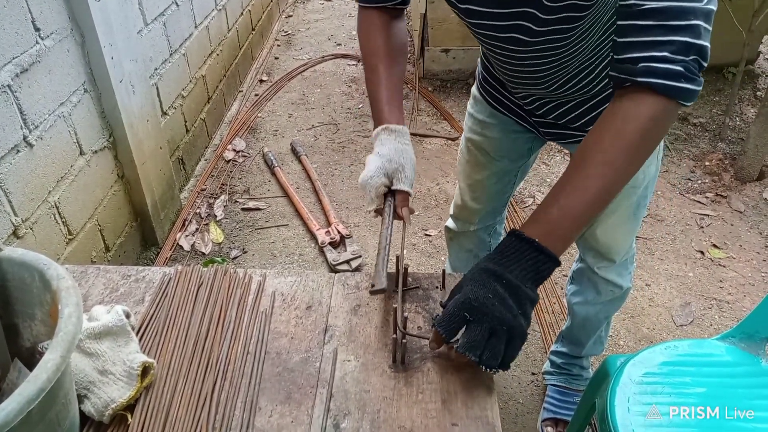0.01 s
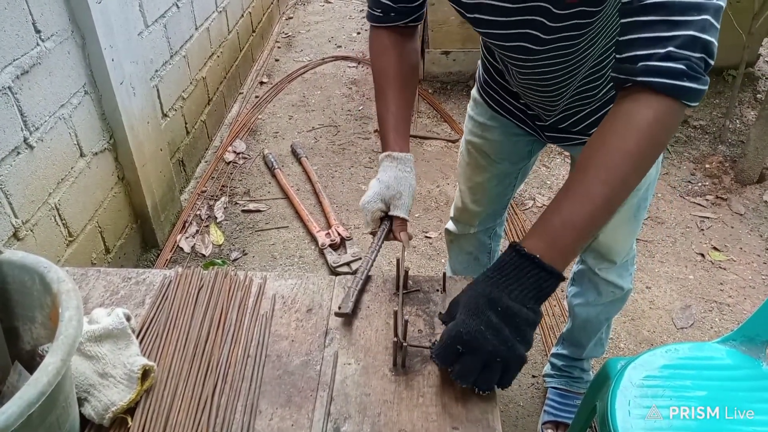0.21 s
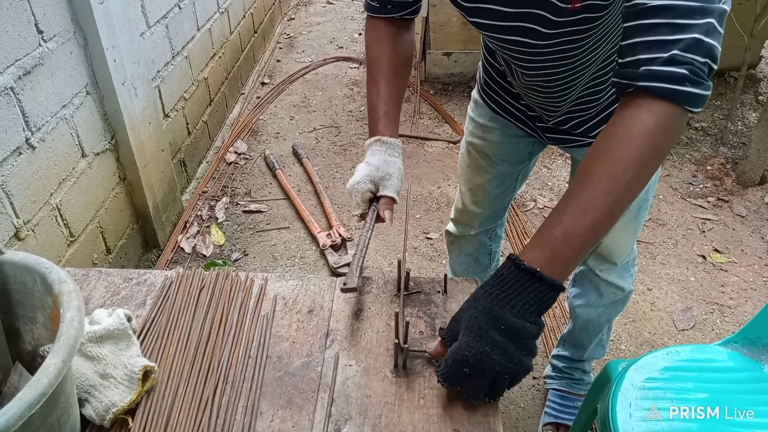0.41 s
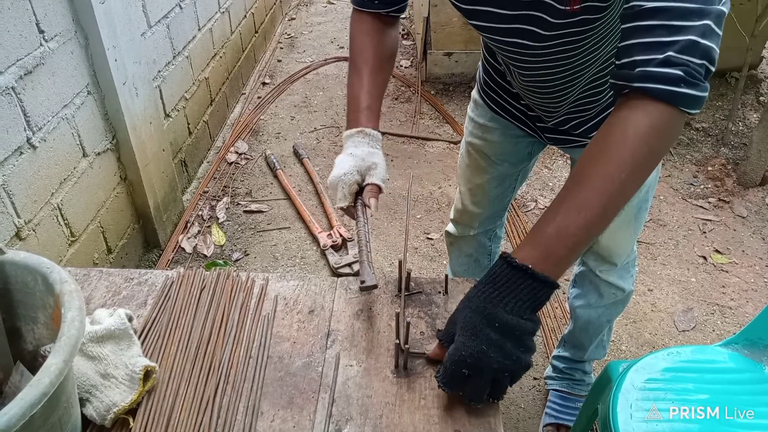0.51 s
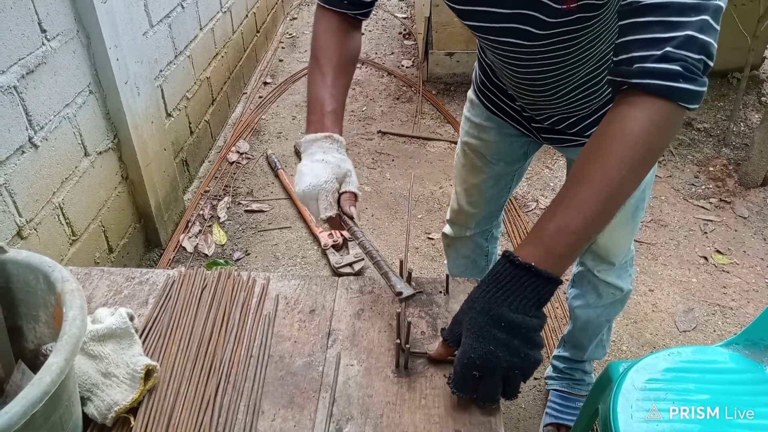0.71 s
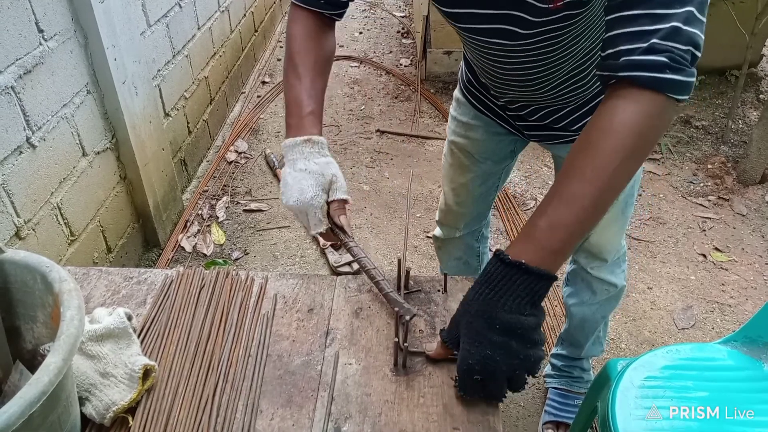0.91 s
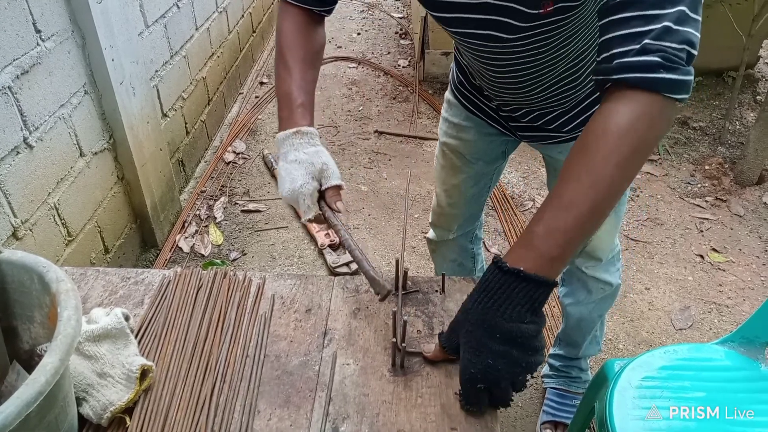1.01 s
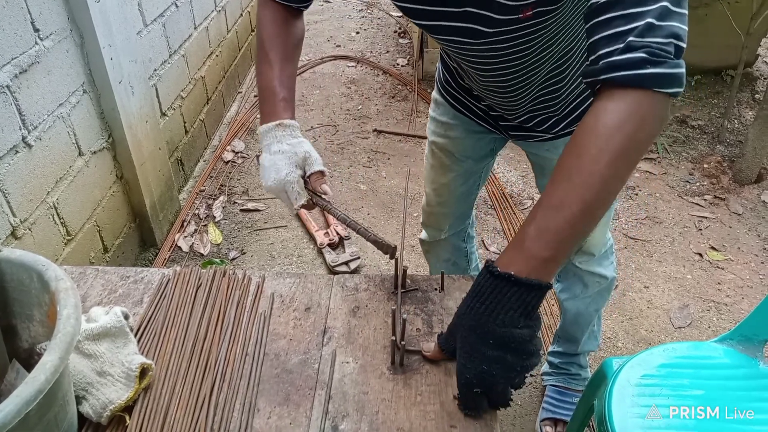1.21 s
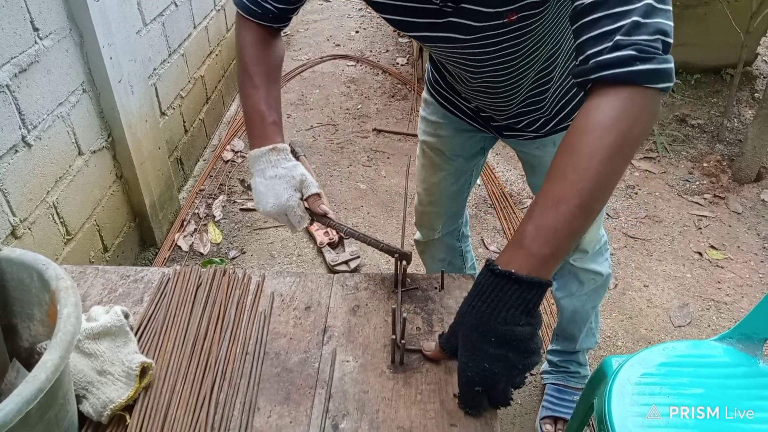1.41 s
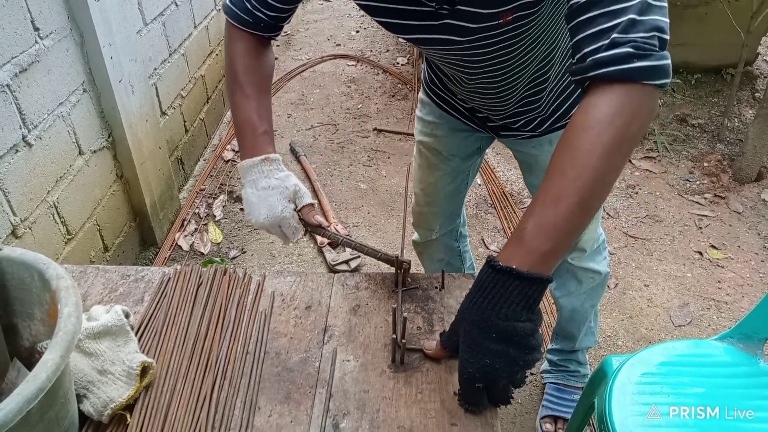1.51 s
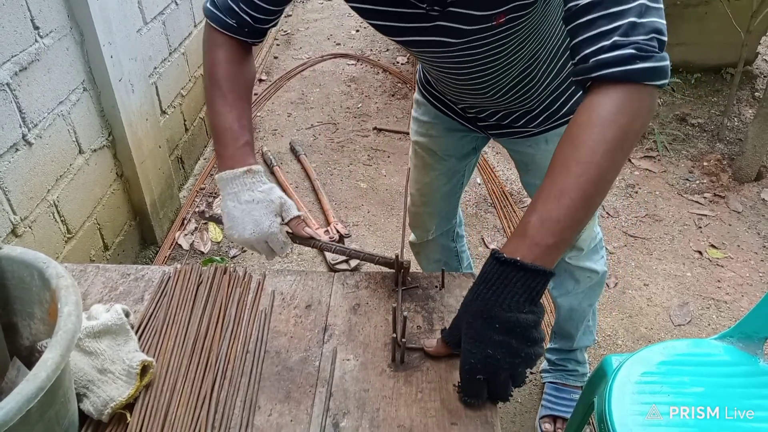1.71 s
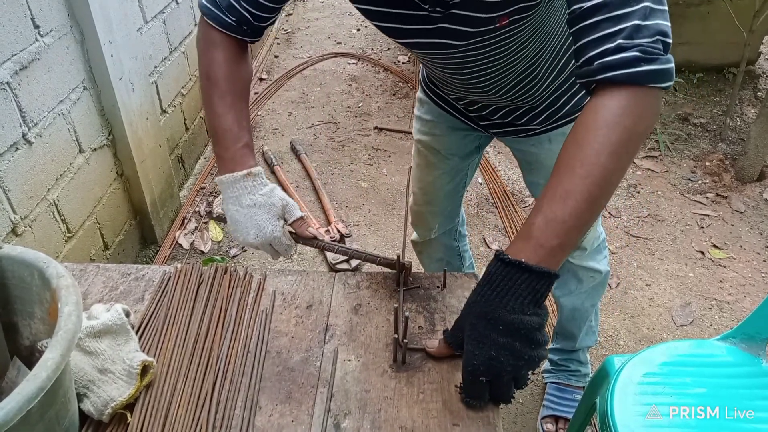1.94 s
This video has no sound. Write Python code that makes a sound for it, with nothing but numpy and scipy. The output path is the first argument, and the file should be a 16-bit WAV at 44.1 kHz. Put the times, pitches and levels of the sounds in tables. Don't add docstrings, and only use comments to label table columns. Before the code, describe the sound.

A steel bar scrapes grittily over a wooden bench and thuds down, then clinks sharply on a steel pin, clinks again, bounces and ends in a quick metallic rattle; quiet yard with insects, close phone microphone.

```python
import sys
import numpy as np
from scipy import signal
from scipy.fft import rfft, irfft, next_fast_len
from scipy.io import wavfile
from scipy.ndimage import uniform_filter1d, minimum_filter1d, map_coordinates

SR = 44100
rng = np.random.default_rng(int(sys.argv[2]) if len(sys.argv) > 2 else 0)


def volts(x):
    e = np.asarray(x, float) / 20
    return 10 ** e


def materialize(psi):
    bounded = np.clip(np.atleast_2d(psi).T, -1, 1)
    quanta = np.round(bounded * 32767).astype(np.int16)
    wavfile.write(sys.argv[1], SR, quanta)


N = 85995

# f/Hz, level/dB, t60/s
BAR_MODES = [(350, -24, .1), (807, -19, .18), (1362, -24, .12), (1680, -18, .12), (1949, -14, .07),
             (2187, -3, .07), (2353, -13, .09), (2864, -2, .06), (3050, -8, .06), (3280, -4, .075),
             (3569, -9, .07), (4030, -1, .055), (6444, -30, .035), (7720, -36, .036)]
# f/Hz, level/dB
STEEL_CLATTER = [(100, -12), (450, -3.5), (620, -16.5), (975, -5), (1220, -14.5), (3500, 4), (4400, -8.5),
                 (5700, -30.5), (15500, -51)]
# f/Hz, level/dB
GRIT_SPECTRUM = [(120, -31.5), (250, -6), (950, 0.5), (1500, -7.5), (3500, 1), (4500, -16.5), (5500, -22.5),
                 (15000, -68)]
STEEL_RISE_S, WOOD_RISE_S = .0008, .0024
STEEL_CRACK, WOOD_CRACK = 3.3, 1.5


def knocks():
    return bench_blows() + pin_and_key_blows() + bar_blows() + rattle() + small_touches()


def bench_blows():
    # f/Hz, level/dB, t60/s
    top_modes = [(210, -4, .06), (320, -3, .07), (410, 0, .085), (474, -1, .085), (764, -15, .12),
                 (877, -17, .12), (2982, -16, .08)]
    # f/Hz, level/dB, t60/s
    edge_modes = [(337, 0, .11), (931, -6, .07), (1307, -15, .06), (1567, -21, .085), (2250, -24, .1),
                  (3095, -24, .14)]
    # f/Hz, level/dB
    wood_clatter = [(80, -12.5), (200, 1.5), (420, -5), (614, -12.5), (800, -12.5), (3460, -16),
                    (4900, -43.5), (15500, -79.5)]
    # t/s, ring level/dB, clatter level/dB, clatter t60/s
    thuds = [
        (.2095, -7.5, -13, 0.089),
        (.2255, -36, -12, 0.076),
    ]
    # t/s, ring level/dB, clatter level/dB, clatter t60/s
    taps = [
        (.5615, -14, -25.5, 0.12),
        (.665, -42, -44, 0.29),
    ]
    on_top = strike(thuds, top_modes, wood_clatter, WOOD_RISE_S, WOOD_CRACK)
    on_edge = strike(taps, edge_modes, wood_clatter, WOOD_RISE_S / 2, WOOD_CRACK)
    return on_top + on_edge


def pin_and_key_blows():
    # f/Hz, level/dB, t60/s
    pin_modes = [(332, -11, .14), (474, -13, .12), (930, -13, .1), (1340, -9, .07), (1760, -9, .096),
                 (1965, -13, .1), (2250, -15, .09), (2984, 1, .13), (3068, -13, .14), (3150, -9, .11),
                 (3418, -10, .17), (3531, -6, .12), (3706, -11, .12), (8969, -46, .17)]
    # f/Hz, level/dB, t60/s
    key_modes = [(700, -6, .065), (750, -19, .2), (797, -23, .2), (1744, -6, .05), (2256, -9, .065),
                 (2625, 0, .062), (3488, -4, .055), (3790, -3, .03), (4120, -4, .04), (4737, -24, .11),
                 (6702, -28, .085), (8974, -35, .085), (11500, -37, .075), (14360, -43, .09)]
    # f/Hz, level/dB
    pin_top = [(8000, -42.5), (12500, -43.5), (15500, -57)]
    # f/Hz, level/dB
    key_top = [(8000, -30), (12500, -40.5), (15500, -54)]
    # t/s, ring level/dB, clatter level/dB, clatter t60/s
    pin_hits = [
        (.8383, -55, -27, 0.021),
        (.8397, -10, -7.5, 0.045),
        (.8475, -28, -7.5, 0.032),
        (.8503, -15.5, -16, 0.13),
    ]
    # t/s, ring level/dB, clatter level/dB, clatter t60/s
    key_hits = [
        (1.2637, -9, -14, 0.05),
        (1.268, -46.5, -15, 0.065),
    ]
    return steel_blows(pin_hits, pin_modes, pin_top) + steel_blows(key_hits, key_modes, key_top)


def bar_blows():
    # f/Hz, level/dB, t60/s
    rebound_modes = [(810, -17, .09), (1965, -11, .09), (2191, -10, .09), (2900, -5, .05), (3214, -1, .05),
                     (4080, -1, .045), (4360, -7, .04), (5200, -27, .04), (6438, -35, .04),
                     (10000, -44, .04), (11700, -42, .035)]
    # f/Hz, level/dB, t60/s
    settling_modes = [(1994, -4, .09), (2127, -5, .09), (2872, 0, .11), (2969, -4, .1), (3243, -5, .08),
                      (4130, -8, .06)]
    # f/Hz, level/dB
    first_top = [(8000, -31.5), (12000, -37.5), (15500, -56.5)]
    # f/Hz, level/dB
    later_top = [(8000, -35), (12000, -55), (15500, -72)]
    # t/s, ring level/dB, clatter level/dB, clatter t60/s
    first_bounce = [
        (1.4503, -7, -18, 0.12),
    ]
    # t/s, ring level/dB, clatter level/dB, clatter t60/s
    rebounds = [
        (1.4945, -14.5, -20, 0.092),
        (1.5228, -19, -22.5, 0.087),
    ]
    # t/s, ring level/dB, clatter level/dB, clatter t60/s
    settle = [
        (1.5448, -20.5, -22, 0.11),
    ]
    drop = steel_blows(first_bounce, BAR_MODES, first_top)
    back = steel_blows(rebounds, rebound_modes, later_top)
    rest = steel_blows(settle, settling_modes, later_top)
    return drop + back + rest


def rattle():
    # f/Hz, level/dB, t60/s
    held_modes = [(144, -14.5, 0.23), (291, -7.5, 0.24), (483, -10, 0.067), (746, -12, 0.18),
                  (938, -4.5, 0.038), (1360, -14.5, 0.23), (1778, -6.5, 0.093), (2140, -14, 0.16),
                  (2490, -8.5, 0.053), (2830, -14, 0.09), (3300, -6, 0.034), (3450, -7.5, 0.18),
                  (3880, -2, 0.029), (9500, -44, 0.027)]
    # f/Hz, level/dB
    rattle_top = [(8000, -44), (12000, -51), (15500, -68)]
    # t/s, ring level/dB, clatter level/dB, clatter t60/s
    contacts = [(1.6027, -19.5, -16, 0.053), (1.606, -22.5, -31, 0.051), (1.6115, -15, -12, 0.018),
                (1.614, -10.5, -22.5, 0.09), (1.6175, -24.5, -0.5, 0.0094), (1.6195, -22, -15, 0.0078),
                (1.6225, -21, -17.5, 0.028), (1.6252, -24.5, -8.5, .04), (1.633, -20.5, -31, 0.062),
                (1.6355, -21.5, -6.5, .02), (1.6378, -35, -25.5, 0.036), (1.6412, -26.5, -13, 0.051),
                (1.647, -14.5, -20, 0.02), (1.65, -20.5, -10, 0.022), (1.6533, -12, -12.5, 0.018),
                (1.6557, -18, -11.5, 0.023), (1.6585, -18.5, -15.5, 0.018), (1.661, -24, -28, 0.028),
                (1.664, -21.5, -25.5, 0.027), (1.669, -21, -19.5, 0.025), (1.6712, -19.5, -32.5, 0.017),
                (1.68, -23, -37, 0.03), (1.687, -27, -37.5, 0.047), (1.694, -28, -35, 0.058)]
    spectrum = STEEL_CLATTER[:-1] + rattle_top
    return strike(contacts, held_modes, spectrum, STEEL_RISE_S, crack=2.5, choked=True)


def small_touches():
    # f/Hz, level/dB
    nick_spectrum = [(300, -22), (1500, 0.5), (3600, -3), (4600, -23), (7500, -36.5), (9500, -35),
                     (11500, -24), (13500, -43)]
    # t/s, ring level/dB, clatter level/dB, clatter t60/s
    nicks = [
        (.2105, -90, -38, .05),
        (.4855, -90, -37, .05),
        (.491, -90, -38, .05),
    ]
    # t/s, ring level/dB, clatter level/dB, clatter t60/s
    nudges = [
        (.951, -90, -41, .06),
        (.974, -90, -40, .06),
        (1.0, -90, -41, .08),
        (1.02, -90, -43, .1),
    ]
    nicking = strike(nicks, BAR_MODES, nick_spectrum, WOOD_RISE_S, WOOD_CRACK)
    nudging = strike(nudges, BAR_MODES, GRIT_SPECTRUM, WOOD_RISE_S, WOOD_CRACK)
    return nicking + nudging


def steel_blows(contacts, modes, treble):
    return strike(contacts, modes, STEEL_CLATTER[:-1] + treble, STEEL_RISE_S, STEEL_CRACK)


def strike(contacts, modes, spectrum, rise, crack, choked=False):
    scatter_db, choke_t60 = 1.5, .035
    out = np.zeros(N + SR)
    t = np.arange(SR // 2) / SR
    hz, level, t60 = np.transpose(modes)[..., None]
    sign = (-1.) ** np.arange(len(hz))[:, None]
    next_contacts = contacts[1:] + [(N / SR + 1,)]
    for (s, ring_db, clatter_db, fade), (after, *_) in zip(contacts, next_contacts):
        chance_db = scatter_db * rng.standard_normal(hz.shape)
        fading = volts(level + chance_db - 60 * t / t60)
        ring = np.sum(sign * fading * np.sin(2 * np.pi * hz * t), axis=0)
        ring = ring * volts(-60 * choked * np.maximum(t + s - after, 0) / choke_t60)
        ring = ring * np.sin(np.pi / 2 * np.minimum(t / rise, 1)) ** 2
        force = rng.standard_normal(len(t)) * volts(-60 * t / fade) * np.minimum(t / rise, 1)
        force[round(rise * SR)] += crack
        clatter = coloured(force, spectrum)
        start = round(s * SR - rise * SR / 2)
        out[start:][:len(t)] += volts(ring_db) * ring + volts(clatter_db) * clatter
    return out[:N]


def scrape():
    # t/s, length/s, level/dB, fall over the stroke/dB
    strokes = [
        (0, .13, -36.5, 1),
        (0.12, 0.075, -43, -4),
        (0.176, 0.075, -32, -2),
        (0.225, 0.13, -54.5, -17.5),
        (0.477, 0.094, -35, 4.5),
        (0.597, 0.036, -46.5, -4.5),
        (0.785, 0.042, -57.5, -12),
        (0.857, 0.2, -45.5, -2.5),
        (1.275, 0.053, -57, 15),
    ]
    grains_per_s, spread_db = 4000, 2.5
    t = np.arange(N) / SR
    when, side, size = rng.random((3, N))
    grains = (when < grains_per_s / SR) * np.sign(side - .5) * volts(-spread_db * np.log(size + 1e-3))
    push = 0
    for s, length, db, fall_db in strokes:
        push = push + volts(db - fall_db * (t - s) / length) * held(s, length, edge=.023)
    rough = volts(0.34 * wobble(71))
    return push * hiss(grains * rough, GRIT_SPECTRUM, patchy_db=3, size=2)


def singing():
    # t/s, length/s, f/Hz, level/dB
    tones = [
        (0, .09, 3700, -34),
        (0, .085, 3020, -36),
        (.03, .06, 4335, -47),
        (.1, .07, 2800, -39),
        (.11, .09, 1968, -40),
        (.125, .06, 1348, -41),
        (.495, .04, 1000, -49),
        (.5, .045, 535, -49),
        (.888, .28, 332, -54),
    ]
    width_hz = 70
    t = np.arange(N) / SR
    out = np.zeros(N)
    for s, length, hz, db in tones:
        fuzzy = wobble(width_hz) * np.sin(2 * np.pi * hz * t) + wobble(width_hz) * np.cos(2 * np.pi * hz * t)
        out += volts(db) * held(s, length, length / 4) * fuzzy
    return out


def wall(x):
    t = np.arange(SR // 2) / SR
    tail = rng.standard_normal(len(t)) * volts(-60 * t / .27) * (t > .006)
    return signal.fftconvolve(x, tail / np.linalg.norm(tail))[:N]


def chirping():
    # t/s, length/s, f/Hz, level/dB
    calls = [
        (.135, .05, 5300, -63),
        (.22, .14, 5650, -64),
        (.94, .24, 5850, -64),
        (1.34, .12, 6050, -70),
        (1.7, .06, 5750, -62),
    ]
    t = np.arange(N) / SR
    beat = 1 + .45 * np.sin(2 * np.pi * 28 * t + wobble(6.5))
    out = np.zeros(N)
    for s, length, hz, db in calls:
        tone = np.sin(2 * np.pi * hz * t + 3.8 * wobble(80))
        out += volts(db) * beat * held(s, length, length / 5) * tone
    return out


def motor():
    # f/Hz, level/dB
    hum_tones = [(67, -52.5), (135, -63)]
    drift, swing_db = .015, 2.5
    turn = 2 * np.pi * np.cumsum(1 + drift * wobble(5.9)) / SR
    return sum(volts(db + swing_db * wobble(68)) * np.sin(hz * turn) for hz, db in hum_tones)


def yard():
    # f/Hz, level/dB
    insects = [(1200, -70), (1700, -13.5), (2250, -4.5), (3300, -0.5), (4050, -2.5), (5100, -32.5),
               (6950, -16), (8000, -32.5)]
    # f/Hz, level/dB
    rumble = [(25, -43), (47, -21), (69, 9), (103, -19), (135, -1.5), (300, -20), (500, -18), (1400, -38)]
    # f/Hz, level/dB
    top_hiss = [(8300, -24), (10600, -23), (11200, -0.5), (11900, 3), (12700, -10), (13900, 2), (15000, -5),
                (15600, -13.5)]
    # t/s, gain/dB
    phone_gain = [(0, 2), (.45, 2), (.62, -1.5), (.7, -5.5), (.83, -9), (.97, -3.5), (1.05, -1.5),
                  (1.36, 2.5), (1.44, -2.5), (1.95, 3)]
    white = rng.standard_normal((3, N))
    noise = volts(-46.5) * hiss(white[0], insects, patchy_db=.8)
    noise += volts(-49) * hiss(white[1], rumble, patchy_db=1.2)
    noise += volts(-76.5) * hiss(white[2], top_hiss, patchy_db=1)
    return volts(curve(phone_gain)) * (noise + motor())


def hiss(source, spectrum, patchy_db, size=5):
    z = signal.stft(source, nperseg=512, noverlap=384)[2]
    across_pitch = uniform_filter1d(rng.standard_normal(z.shape), size, axis=0)
    patches = unit(uniform_filter1d(across_pitch, 16, axis=1))
    patchy = signal.istft(z * volts(patchy_db * patches), nperseg=512, noverlap=384)[1][:N]
    return unit(coloured(patchy, spectrum))


def coloured(x, points):
    m = 2 * next_fast_len(len(x) // 2 + 4096)
    f, db = np.transpose([(1, -90)] + list(points) + [(SR / 2, -110)])
    gain = volts(np.interp(np.log(np.fft.rfftfreq(m, 1 / SR) + 1), np.log(f), db))
    cepstrum = irfft(np.log(gain / np.sqrt(np.mean(gain ** 2))), m)
    cepstrum[1:m // 2] *= 2
    cepstrum[m // 2 + 1:] = 0
    return irfft(rfft(x, m) * np.exp(rfft(cepstrum)), m)[:len(x)]


def held(s, length, edge):
    t = np.arange(N) / SR - s
    return np.clip(np.minimum(t, (length + edge - t) / 2) / edge, 0, 1)


def wobble(rate):
    return map_coordinates(rng.standard_normal(int(N * rate / SR) + 4), [np.arange(N) * rate / SR])


def curve(rows):
    rows = np.asarray(rows, float)
    return np.interp(np.arange(N) / SR, rows[:, 0], rows[:, 1])


def unit(x):
    return x / np.sqrt(np.mean(x ** 2) + 1e-20)


def scene():
    near = knocks()
    echo = volts(-16.5) * wall(near)
    return (near + echo + scrape() + singing() + yard() + chirping())[None]


def roll_off(x):
    return signal.sosfilt(signal.butter(12, 15690, fs=SR, output="sos"), x)


def record(dry):
    ceiling, look_ahead = .82, 88
    x = signal.sosfilt(signal.butter(2, 55.6, "high", fs=SR, output="sos"), dry)
    need = minimum_filter1d(np.minimum(1, ceiling / (np.abs(x) + 1e-9)), 2 * look_ahead)
    mix = x * uniform_filter1d(need, look_ahead)
    return roll_off(mix)


dry = scene()
out = record(dry)
materialize(out)
```